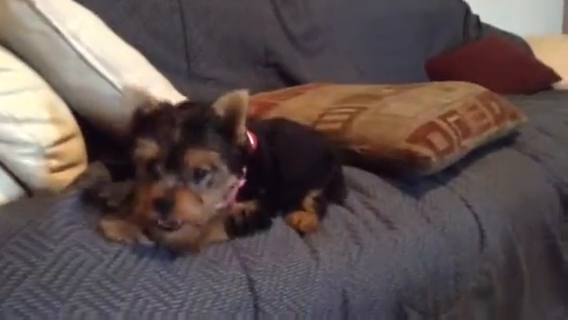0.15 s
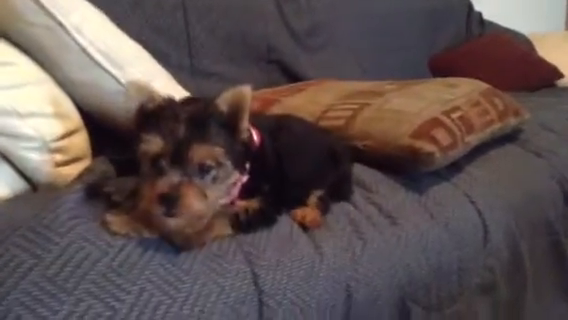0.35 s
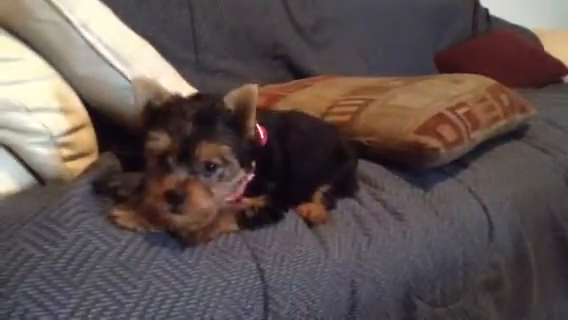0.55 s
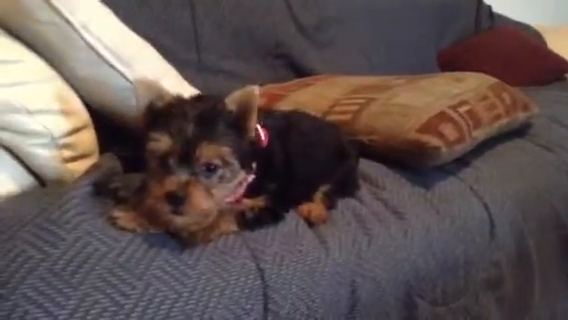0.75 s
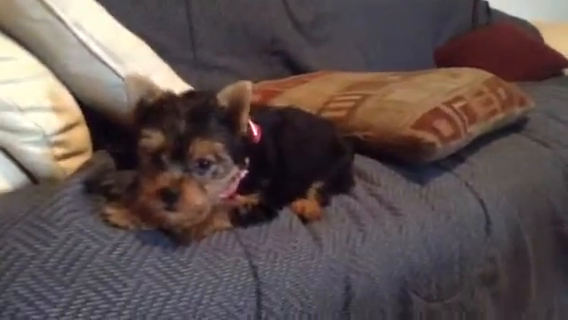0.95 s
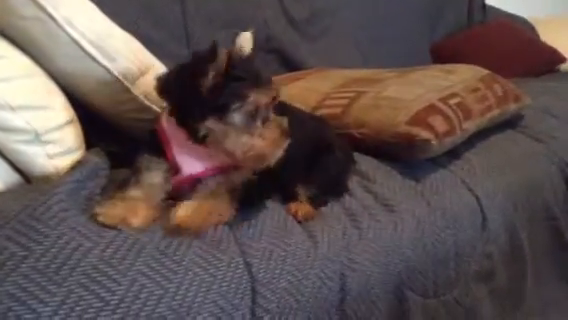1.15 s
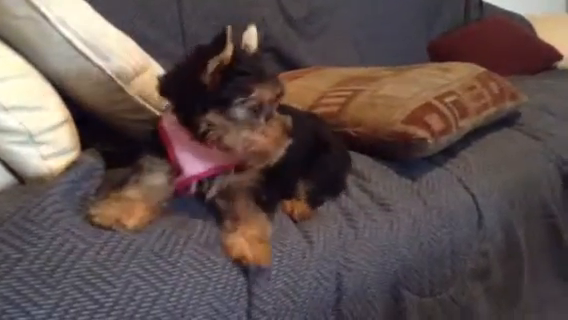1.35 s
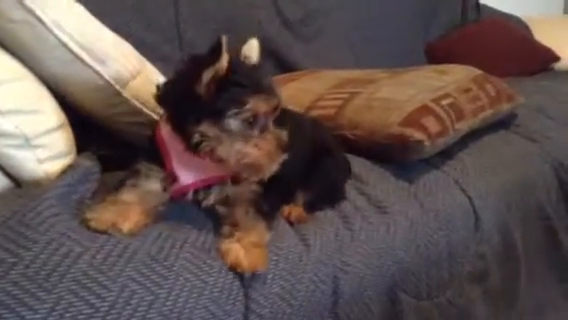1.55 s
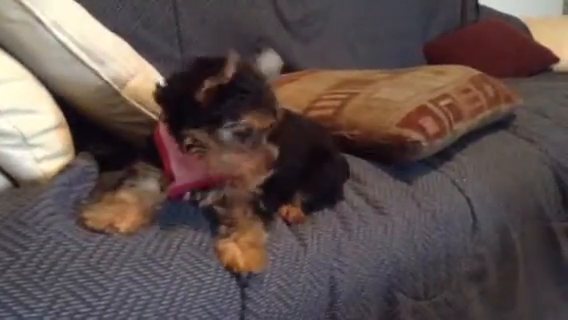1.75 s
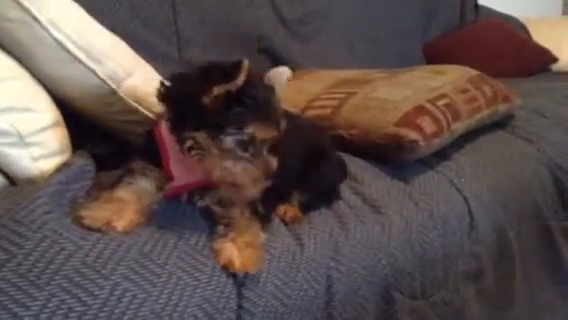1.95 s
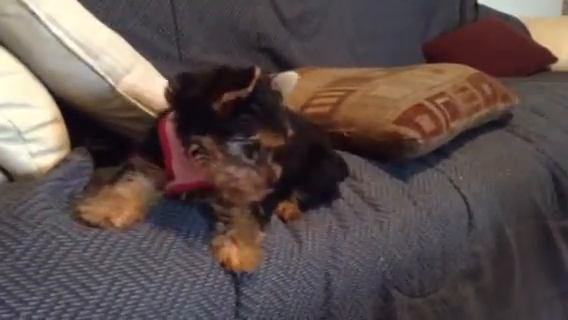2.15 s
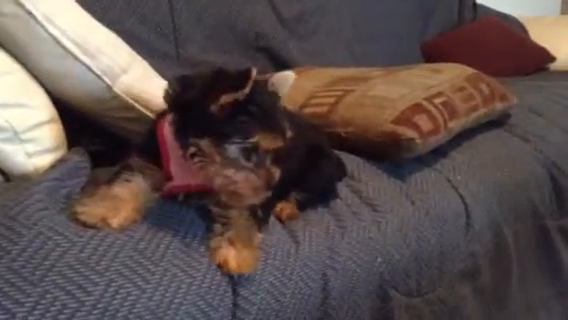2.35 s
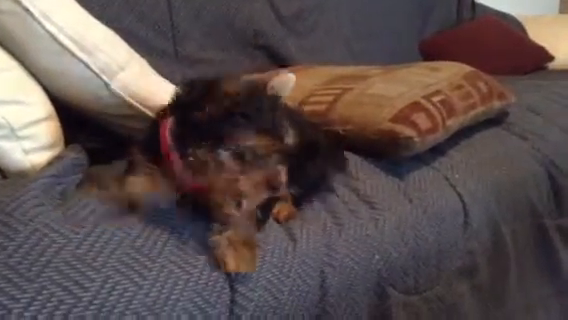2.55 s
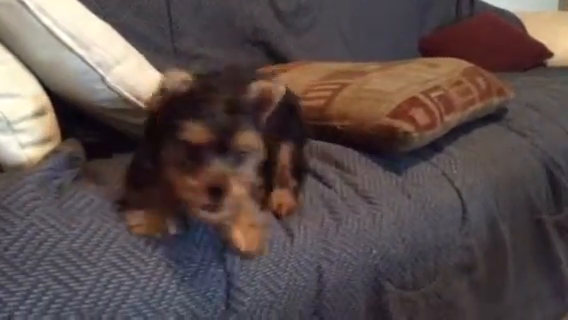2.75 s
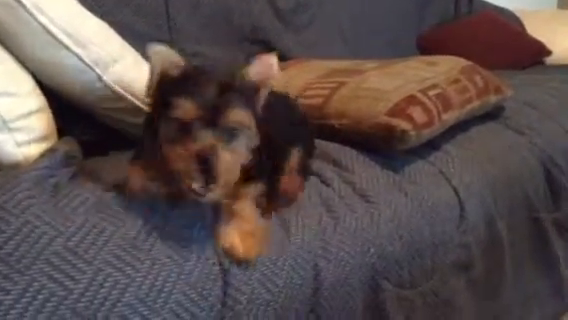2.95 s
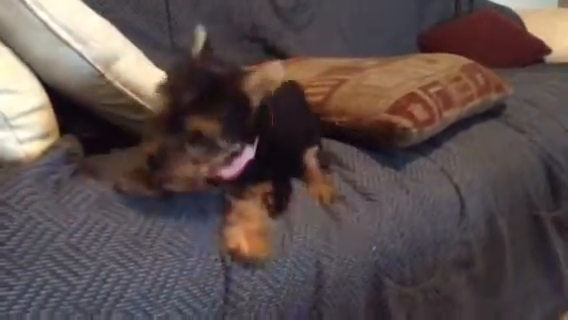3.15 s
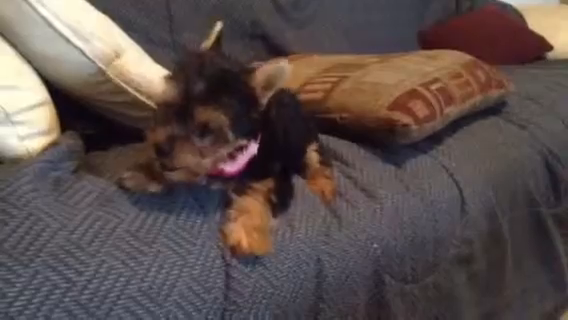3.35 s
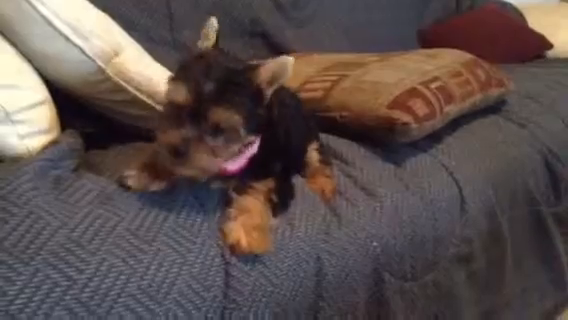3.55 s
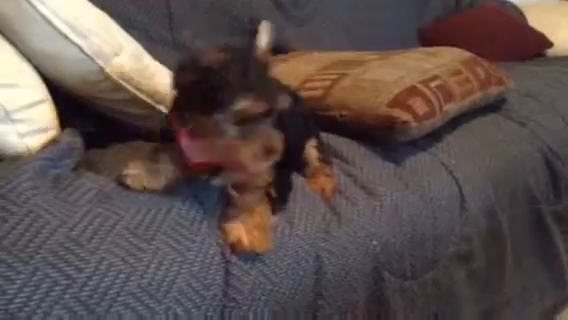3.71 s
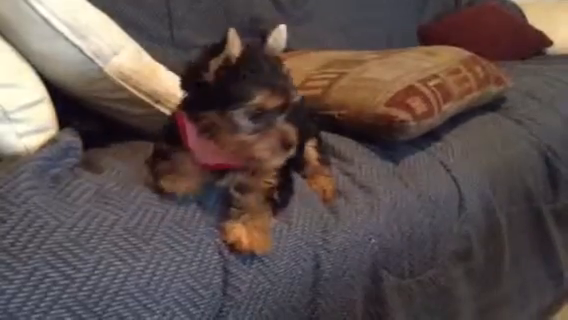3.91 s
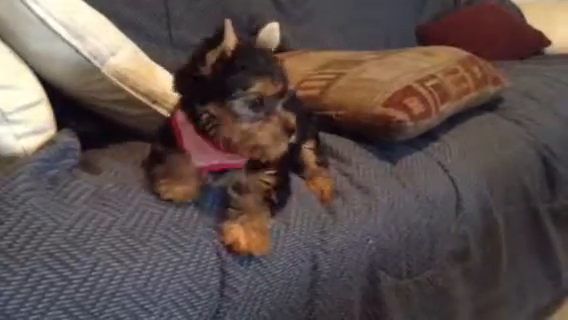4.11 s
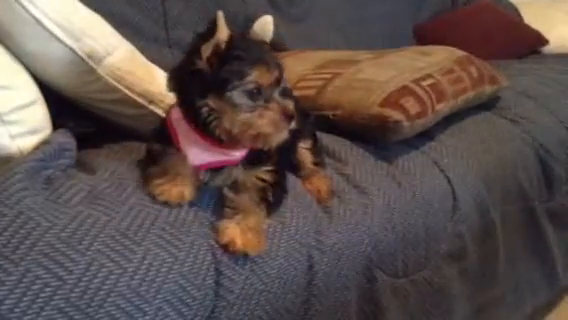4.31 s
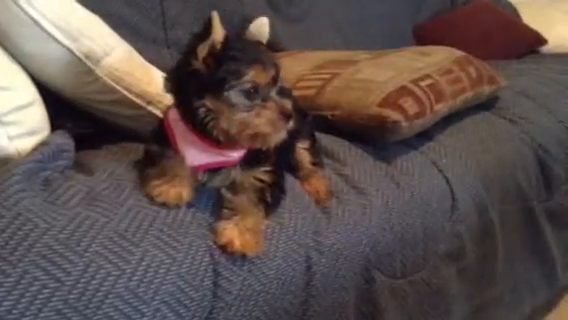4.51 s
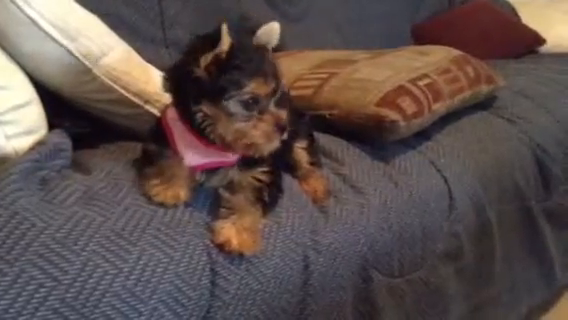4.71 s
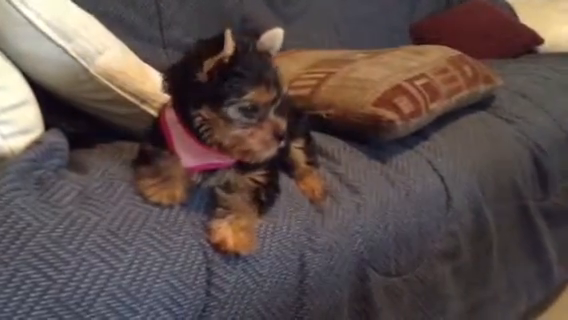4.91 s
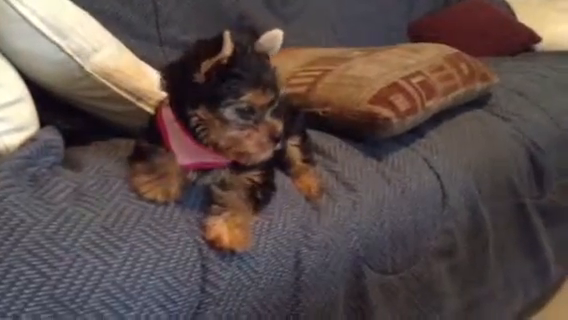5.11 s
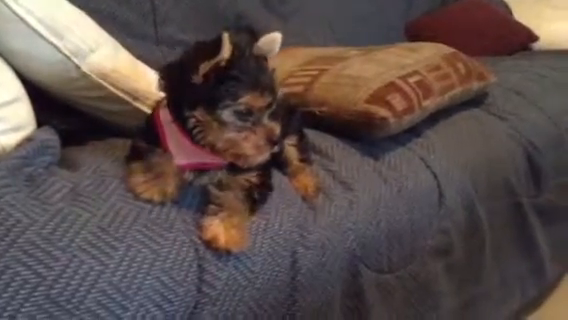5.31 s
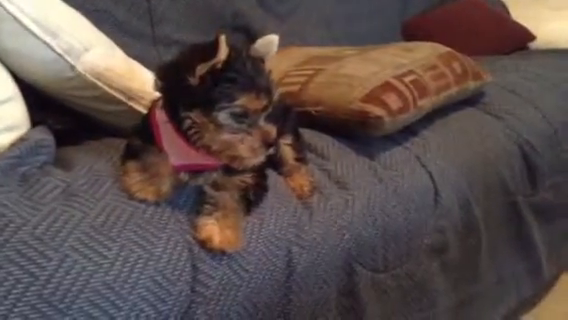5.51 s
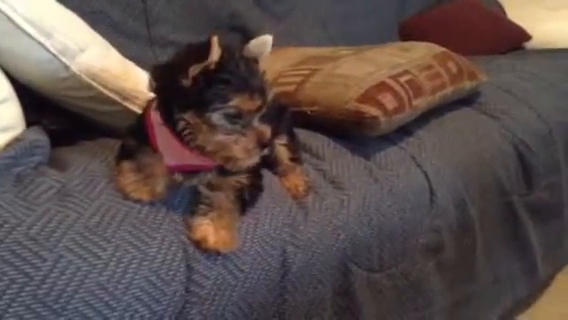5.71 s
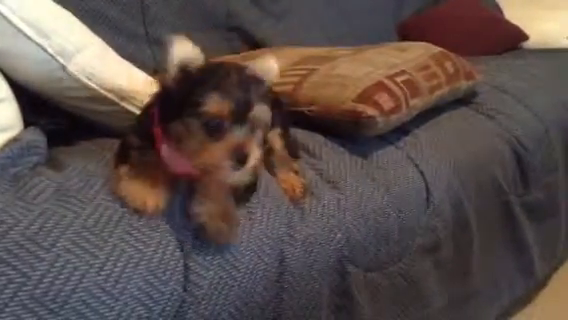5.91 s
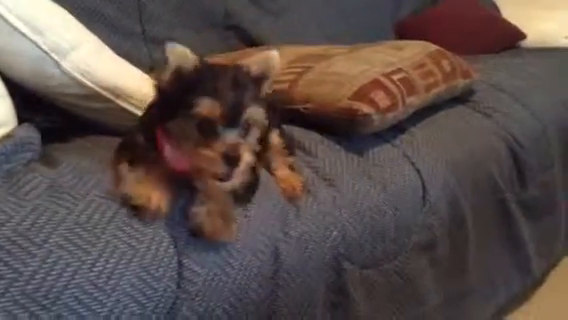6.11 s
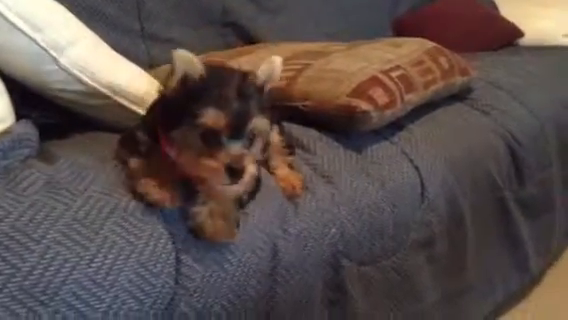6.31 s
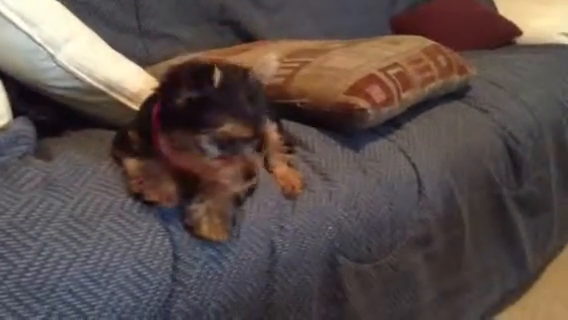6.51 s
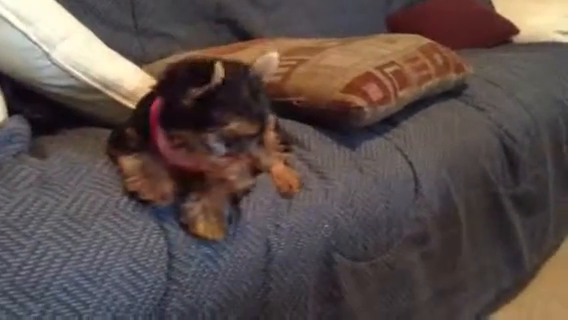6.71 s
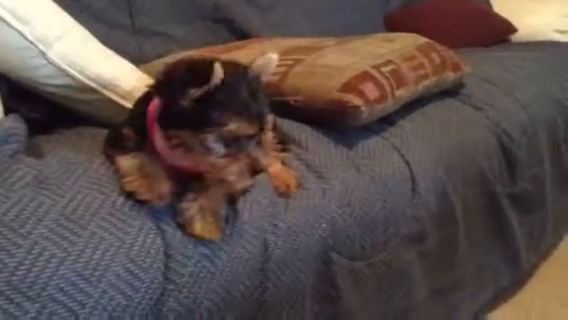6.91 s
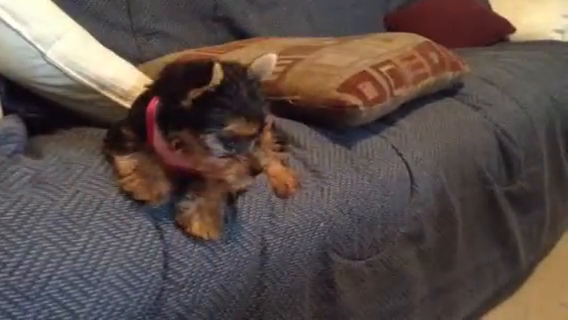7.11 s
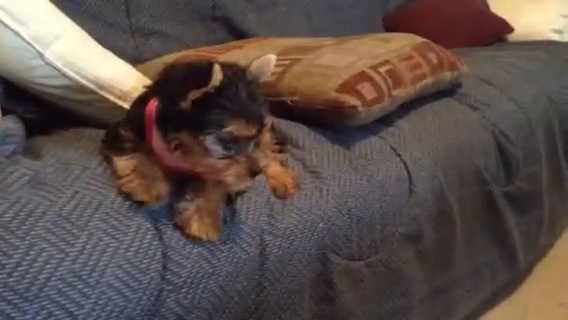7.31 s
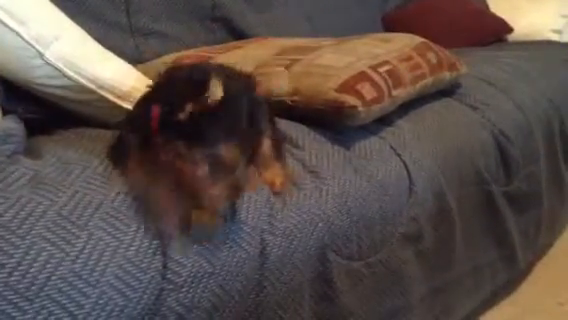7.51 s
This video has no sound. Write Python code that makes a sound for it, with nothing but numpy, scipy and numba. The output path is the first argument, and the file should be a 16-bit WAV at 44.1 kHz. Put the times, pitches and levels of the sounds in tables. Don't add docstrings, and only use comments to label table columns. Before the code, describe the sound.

Over faint hum and hiss, a tiny dog shuffles on a sofa, bursts into a piercing squeal and yap, yaps again, then grumbles softly.

```python
import sys
import numpy as np
from scipy import signal
from scipy.fft import rfft, irfft
from scipy.io import wavfile
from scipy.ndimage import uniform_filter1d, minimum_filter1d
from numba import njit

SR = 44100
rng = np.random.default_rng(int(sys.argv[2]) if len(sys.argv) > 2 else 0)


def output_pcm(signal):
    pcm = np.clip(np.atleast_2d(signal).T, -1, 1) * 32767
    wavfile.write(sys.argv[1], SR, np.round(pcm).astype(np.int16))


def amplitude_ratio(level_db):
    exponent = np.asarray(level_db, float) / 20
    return 10 ** exponent


N = 333207
LEAD = int(.2 * SR)
T = (np.arange(N + LEAD) - LEAD) / SR

# frequency in Hz, level in dB per Hz.
HISS_COLOUR = [(20, -56.5), (88, -21.5), (123, -4.5), (167, -13), (480, -21), (2800, -33.5), (11000, -34),
               (15500, -44)]
# time in seconds, pitch in Hz, level in dB, mouth resonance in Hz.
EARLIER_YAP = [
    (-.13, 458.7, -41.5, 1400),
    (-.1, 520, -5.5, 1426),
    (-.03, 500, -12.5, 1580),
    (-.01, 439.7, -23.5, 1450),
]
SECOND_YAP = [
    (3.003, 347.9, -48, 1400),
    (3.018, 349.8, -25, 1573),
    (3.034, 429.3, -8.5, 1772),
    (3.045, 521.5, -14.5, 1717),
    (3.066, 567.8, -5.5, 1703),
    (3.082, 545.6, -13.5, 1750),
    (3.098, 485.7, -17, 1940),
    (3.11, 410.5, -39, 1580),
]
THIRD_YAP = [
    (5.891, 323.5, -49, 620),
    (5.9, 335, -34.5, 650),
    (5.917, 383.4, -30, 1100),
    (5.93, 440.5, -16, 1800),
    (5.945, 500, -13.5, 2090),
    (5.967, 549, -11.5, 2000),
    (5.982, 520, -16.5, 2600),
    (5.995, 428, -28.5, 2300),
]
# time in seconds, pitch in Hz, level in dB,
# roughness from 0 to 1, mouth resonance in Hz.
SQUEAL = [(2.672, 1052, -3, .05, 3150), (2.679, 1171, -9, .25, 3300), (2.682, 1377, -3.5, 0.31, 1450),
          (2.702, 1682, -7.5, 0.4, 1650), (2.708, 1279, 0, .45, 2279), (2.733, 1207, -8.5, .3, 2514),
          (2.737, 1810, -14, .1, 3533), (2.744, 1538, -10.5, 0.1, 3150), (2.753, 1270, -11, .15, 2560)]
# start and length in seconds, first and last pitch in Hz,
# level in dB.
SAGS = [
    (2.752, .045, 1000, 560, -33.5),
    (3.11, .035, 406, 294.4, -36),
    (5.995, .032, 426.3, 296.5, -30.5),
]
# frequency in Hz, width in Hz.
THROAT = [(450, 770), (1100, 1000), (2800, 500), (3950, 660), (5400, 1500), (7300, 1500), (11000, 1000),
          (14000, 5600)]
# mouth width in Hz, throat shortness (scales the resonances),
# then the level of each throat resonance in dB.
YAP_SHAPES = [
    (560, 0.96, -45, -38.5, 2, 1, -21, -25, -54, -15.5),
    (844.5, 1.02, -33.5, -12.5, -10, -8, -26, -32.5, -36.5, -34),
    (595, 1.01, -17, -18.5, -7.5, -8, -21, -34.5, -18, -32),
    (1100, .99, -19, -7.5, -11, -12, -13, -20, -46.5, -36.5),
]
GRUMBLE_SHAPE = (227, .55, -5, -46, -39, -47, -43, -55, -51.5, -63)
# start and length in seconds, pitch in Hz, level in dB, roughness from 0 to 1.
GRUMBLES = [
    (0.174, 0.062, 224.5, -41, 0.13),
    (0.236, 0.0834, 215, -54, 0.01),
    (6.335, 0.085, 210.2, -48, 0.42),
    (6.395, 0.038, 298.6, -44, 0.28),
    (6.446, 0.061, 297, -48.5, 0.21),
    (6.552, .105, 301.6, -51.5, 0.35),
]
# frequency in Hz, t60 in seconds, level in dB re direct sound.
ROOM = [(200, 0.5, -12.5), (500, 0.96, -12.5), (1330, 0.54, -11.5), (2310, 0.32, -13), (4518, 0.57, -14.5),
        (7500, 0.19, -14.5), (12000, .3, -15.5)]
# start in seconds, peak in dB, dull part in dB, bright part in dB,
# length in seconds.
SLIDES = [(.618, -47.5, 1.5, -31, 0.093), (.826, -32, -2, -8, 0.061), (3.453, -30, -1, 2.5, 0.076),
          (3.484, -34, -1.5, 1, 0.086), (3.581, -36.5, -11, -7, .075), (3.673, -46.5, -4, -5.5, 0.19),
          (3.746, -32.5, -1, -3, 0.091), (3.863, -40.5, -7, -0.5, 0.049), (3.892, -39.5, -5, -1.5, 0.082),
          (4.573, -40, -3, -20, 0.067), (6.33, -41, 3, -5, 0.033), (6.501, -33.5, -8, -3.5, 0.053),
          (6.532, -44.5, -8, 1.5, 0.081), (6.63, -45, -5, -11.5, 0.063)]
DRAGS = [
    (1.201, -63, 7, -3, 0.25),
    (1.49, -59, 5.5, -18, 0.18),
    (6.265, -30, -15, 4.5, 0.11),
    (7.17, -57.5, 4, -25, 0.17),
    (7.385, -59, 5.5, -26.5, 0.11),
]
# start in seconds, peak in dB, dull part in dB, bright part in dB.
FIDGETS = [(0.981, -53.5, 4.5, -10), (1.527, -57.5, -16, -10), (2.281, -75, 18.5, -11),
           (2.368, -50.5, -0.5, -28), (2.587, -48.5, -8, -20), (2.614, -45, -15, -15),
           (4.096, -49.5, 4, -2.5), (4.181, -49.5, -10, -9), (4.258, -45.5, 3.5, -8.5),
           (4.359, -51, -0.2, -8), (4.398, -53, -4, -7), (4.446, -50, -0.5, -1.5), (4.521, -50.5, -6, -10),
           (4.725, -44, 1.5, 7), (4.744, -56.5, 4, -14), (4.854, -53, -6, -10), (5.42, -63, -2.5, -0.5),
           (5.748, -65, 7, -24.5)]
SHUFFLES = [(1.159, -56.5, 3.5, -9), (1.209, -67, 11.5, -1.2), (1.289, -61, -2, -3),
            (1.439, -72.5, 17.5, -11), (1.527, -52, 0, -28), (1.62, -60.5, 5, 0), (1.678, -65, 8.5, -6),
            (1.809, -64.5, 10, -8), (1.879, -59.5, 4.5, -14), (1.96, -54.5, 3, -12), (2.019, -62.5, 1, -3),
            (2.083, -47.5, -4.5, -0.1), (5.345, -61, 1.5, -13), (6.959, -51, 3, -9),
            (7.107, -47.5, 5.5, -6.5), (7.149, -51.5, 2.5, -16), (7.364, -60.5, 8, -12),
            (7.469, -63, 6, -6)]
# from Hz, to Hz.
CLOTH = [(300, 1400), (1200, 4700), (4600, 11000)]
HOLLOW = [(720, 2000), (2150, 3300), (3300, 4400)]
# start in seconds, level in dB, length in seconds.
THUMPS = [
    (2.674, -27.5, 0.0017),
    (2.679, -29, 0.0022),
    (3.0417, -12.5, 0.00058),
    (5.95, -38, 0.002),
]
# frequency in Hz, width in Hz, level in dB.
TAG_MODES = [(2920, 6.4, -13), (4580, 24, -9.5), (5060, 20, -12), (6140, 71.4, 1), (7210, 20, -6),
             (7740, 36, -2), (9100, 41, -10), (10460, 37, -4.5), (10730, 15, -15), (12230, 50, -31.5),
             (12780, 23, -16.5), (13900, 52, -24.5)]
# start in seconds, level in dB, length of the rattle in seconds.
CLINKS = [
    (7.041, -48.5, 0.053),
]


def level(x, db):
    return x * amplitude_ratio(db) / np.sqrt(np.mean(x ** 2))


@njit
def svf(x, hz, width):
    y, b, l = np.empty(len(x)), 0., 0.
    for i in range(len(x)):
        g, k = np.tan(np.pi * hz[i] / SR), width / hz[i]
        v = (b + g * (x[i] - l)) / (1 + g * (g + k))
        b, l, y[i] = 2 * v - b, l + 2 * g * v, k * v
    return y


def band(x, hz, width):
    hz = hz + np.zeros(len(x))
    forth = svf(x, hz, 1. * width)
    return svf(forth[::-1].copy(), hz[::-1].copy(), 1. * width)[::-1]


def wobble(count, hz):
    size = max(int(SR / hz), 1)
    smooth = uniform_filter1d(rng.standard_normal(count), size)
    return level(uniform_filter1d(smooth, size), 0)


def add(out, x, s):
    start = LEAD + int(s * SR)
    out[start:start + len(x)] += x[:len(out) - start]


def hum_and_hiss():
    hz, db = np.transpose(HISS_COLOUR)
    f = np.fft.rfftfreq(N, 1 / SR) + 1
    colour = amplitude_ratio(np.interp(np.log(f), np.log(hz), db))
    hiss = irfft(rfft(rng.standard_normal(N)) * colour, N)
    hum_hz = 118.3 * (1 + 0.01 * wobble(N, 21))
    hum = np.sin(2 * np.pi * np.cumsum(hum_hz) / SR) * amplitude_ratio(2.3 * wobble(N, 9))
    return level(hiss, -70) * amplitude_ratio(.8 * wobble(N, 5)) + level(hum, -78.5)


def yap(rows, clearest=.09):
    open_hz, rough_per_octave, roughest = 2030, 1.7, .48
    s, hz, db, mouth = np.transpose(rows)
    rough = rough_per_octave * np.log2(hz.max() / hz) * np.minimum(mouth / open_hz, 1)
    rough = np.clip(rough, clearest, max(roughest, clearest))
    dull_db = np.minimum(15.5 * np.log2(open_hz / mouth), 16)
    return np.transpose([s, hz, db, rough, mouth, dull_db])


def fold_source(hz, rough):
    count, overtones_to_hz = len(hz), 7000
    phase = 2 * np.pi * np.cumsum(hz * (1 + .12 * rough * wobble(count, 350))) / SR
    order = np.arange(1, 60)[:, None]
    skew = .11 * order ** 2
    strength = (order * hz < 16000) / (1 + (order * hz / overtones_to_hz) ** 4)
    pulses = np.sum(np.cos(order * phase - skew) * strength, axis=0) * np.sqrt(hz / 11000)
    pulses = pulses * amplitude_ratio(6.3 * rough * wobble(count, 500))
    flutter = np.cos(2 * np.pi * np.cumsum(520 * (1 + 0.1 * wobble(count, 150))) / SR)
    pulses = pulses * (1 + 2.5 * rough * (hz > 800) * flutter)
    breath = rng.standard_normal(count) * (1 + 0.81 * np.cos(phase))
    source = np.sqrt(1 - rough) * pulses + 1.2 * rough * breath
    airy = signal.butter(4, overtones_to_hz, "high", fs=SR, output="sos")
    return source + .8 * signal.sosfilt(airy, breath)


def voice(rows, shape):
    s, *columns = np.transpose(rows)
    t = np.arange(s[0], s[-1], 1 / SR)
    hz, db, rough, mouth, dull_db = (np.interp(t, s, c) for c in columns)
    source = fold_source(hz, np.clip(rough, 0, 1))
    mouth_width, shortness, *gains_db = shape
    out = band(source, mouth, mouth_width)
    for (f, width), gain_db in zip(THROAT, gains_db):
        gain = amplitude_ratio(gain_db - dull_db * np.log2(f / 1300))
        out = out + gain * band(source, f * shortness, 1.2 * width)
    out = out - np.clip(1.5 * np.log2(mouth / 1000), 0, .9) * band(out, 520, 670)
    out = signal.sosfilt(signal.butter(6, .88 * hz.min(), "high", fs=SR, output="sos"), out)
    loudness = np.sqrt(uniform_filter1d(out ** 2, int(.01 * SR)) + 1e-9)
    fade = signal.windows.tukey(len(t), .006 * SR / len(t))
    return -out / loudness * amplitude_ratio(db) * fade


def room(x):
    t = np.arange(int(.8 * SR)) / SR
    tail = 0
    for hz, t60, db in ROOM:
        dying = band(rng.standard_normal(len(t)), hz, 1.26 * hz) * np.exp(-np.log(1000) * t / t60)
        tail = tail + amplitude_ratio(db) * dying / np.sqrt(t60 * SR / 14)
    tail = 1.6 * tail * np.clip((t - .004) / .02, 0, 1)
    return x + signal.fftconvolve(x, tail)[:len(x)]


def grumble(s, length, hz, db, rough):
    mouth = (0.8 + 4.3 * rough) * hz
    edge_db = db - 10
    return [(s, 0.76 * hz, edge_db, rough, mouth, 0),
            (s + 0.455 * length, 1.0 * hz, db, rough, mouth, 0),
            (s + length, hz, edge_db, rough, mouth, 0)]


def scuffs(strokes, bands):
    grains = rng.standard_normal((3, len(T))) * amplitude_ratio(2.2 * wobble(len(T), 900))
    parts = []
    for grain, edges_hz in zip(grains, bands):
        part = signal.sosfilt(signal.butter(3, edges_hz, "band", fs=SR, output="sos"), grain)
        parts.append(level(part, 0) * amplitude_ratio(1.3 * wobble(len(T), 18)))
    gains = np.zeros((3, len(T)))
    t = np.arange(int(.7 * SR)) / SR
    for s, db, dull_db, bright_db, rise, length in strokes:
        snag = (rise < .025) * np.exp(-t / .0025)
        swell = 1 - np.exp(-(t / max(rise, .001)) ** 2)
        stroke = swell * np.exp(-(t / max(length, .005)) ** 2)
        for gain, part_db in zip(gains, (dull_db, 0, bright_db)):
            add(gain, (stroke + 0.56 * snag) * amplitude_ratio(db + part_db - 11.5), s)
    return np.sum(gains * parts, axis=0)


def rustle():
    near = [(*r[:4], 0.0094, r[4]) for r in SLIDES]
    near += [(*r[:4], .06, r[4]) for r in DRAGS]
    near += [(*r, .005, .06) for r in FIDGETS]
    far = [(*r, 0.0061, 0.051) for r in SHUFFLES]
    return scuffs(near, CLOTH) + scuffs(far, HOLLOW)


def squeal():
    s, hz, db, rough, mouth = SQUEAL[0]
    attack = (s - .004, .95 * hz, db - 27, rough, mouth)
    return [(*r, 0.2) for r in [attack, *SQUEAL]]


def thumps():
    out = np.zeros(len(T))
    for s, db, length in THUMPS:
        add(out, -amplitude_ratio(db) * np.hanning(int(length * SR) + 3), s)
    return out


def sag(s, length, hz, end_hz, db):
    rest = .22, 740, 2
    return [(s, hz, db, *rest), (s + length, end_hz, db - 3.5, *rest)]


def puppy():
    out = np.zeros(len(T))
    yaps = yap(EARLIER_YAP, .8), squeal(), yap(SECOND_YAP), yap(THIRD_YAP)
    for rows, shape in zip(yaps, YAP_SHAPES):
        add(out, voice(rows, shape), rows[0][0])
    for row, shape in zip(SAGS, YAP_SHAPES[1:]):
        add(out, voice(sag(*row), shape), row[0])
    for row in GRUMBLES:
        add(out, voice(grumble(*row), GRUMBLE_SHAPE), row[0])
    return out


def tag():
    out, t = np.zeros(len(T)), np.arange(int(.2 * SR)) / SR
    for s, db, length in CLINKS:
        taps = rng.standard_normal(len(t)) * (1 - np.exp(-t / 0.00506)) * np.exp(-t / length)
        for f, width, mode_db in TAG_MODES:
            ring = svf(taps, np.full(len(t), 1. * f), 7 * width)
            add(out, amplitude_ratio(db + mode_db) * ring * np.sqrt(SR / (12 * width)), s)
    return out


def scene():
    in_room = room(puppy() + rustle() + tag())
    return (in_room[LEAD:] + thumps()[LEAD:] + hum_and_hiss())[None]


def top_cut(x):
    return signal.sosfilt(signal.butter(12, 15960, fs=SR, output="sos"), x)


def record(dry):
    size = int(.0015 * SR)
    allowed = np.minimum(1, .76 / (np.abs(dry) + 1e-9))
    gain = uniform_filter1d(minimum_filter1d(allowed, size), size)
    treble_end = signal.ellip(8, .2, 60, 15450, fs=SR, output="sos")
    return top_cut(signal.sosfilt(treble_end, dry * gain))


dry = scene()
out = record(dry)
output_pcm(out)
```